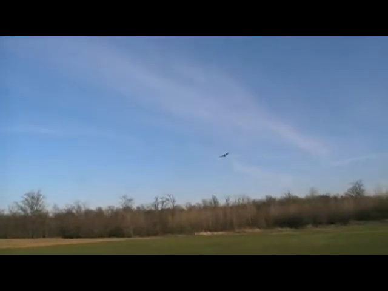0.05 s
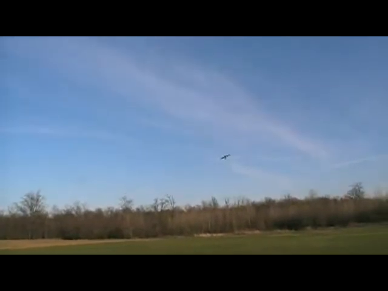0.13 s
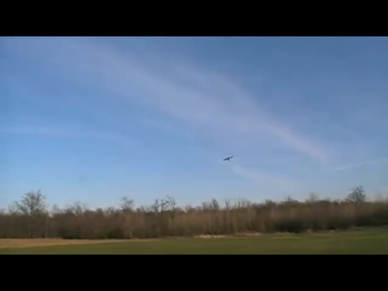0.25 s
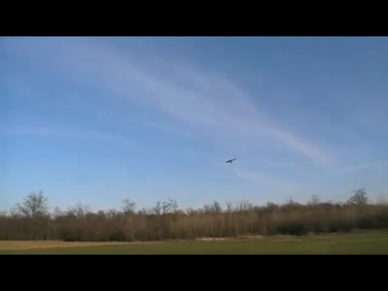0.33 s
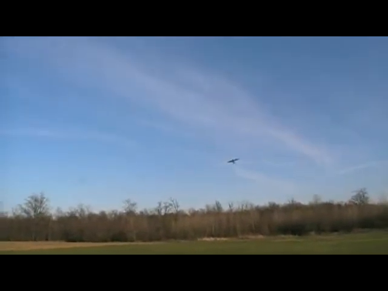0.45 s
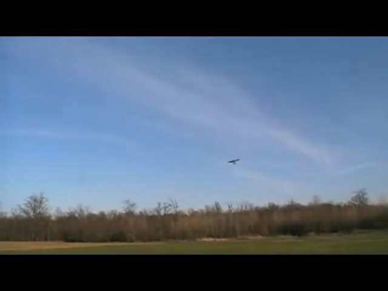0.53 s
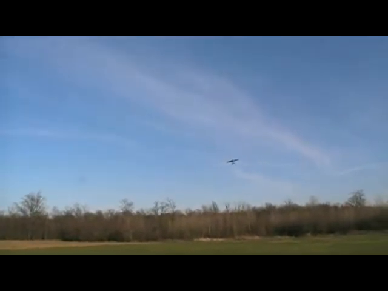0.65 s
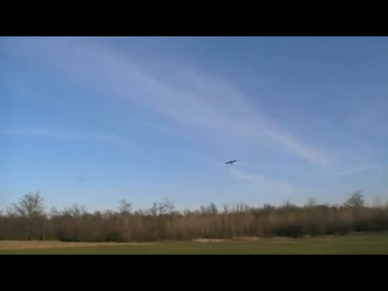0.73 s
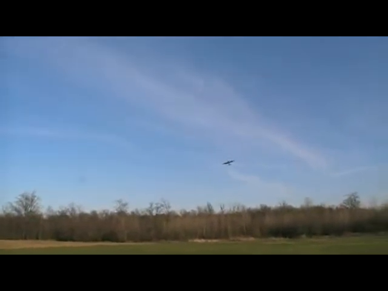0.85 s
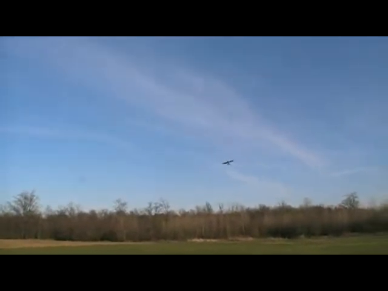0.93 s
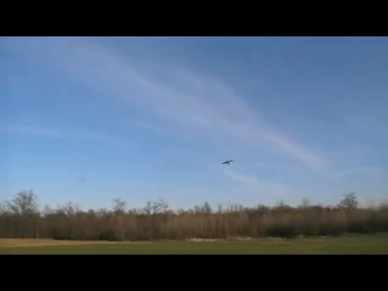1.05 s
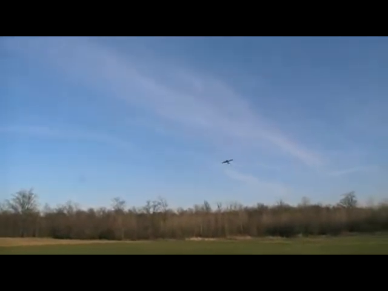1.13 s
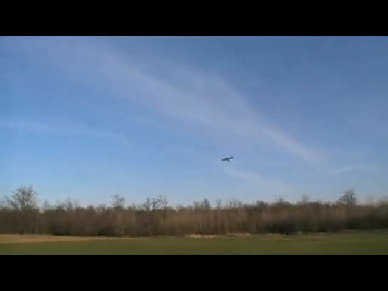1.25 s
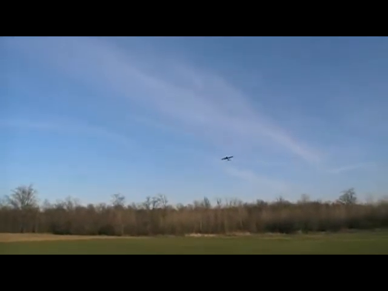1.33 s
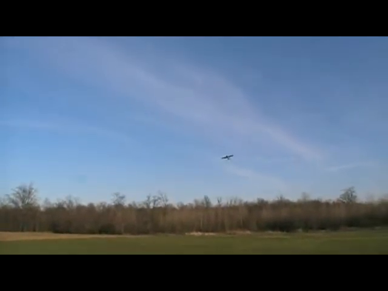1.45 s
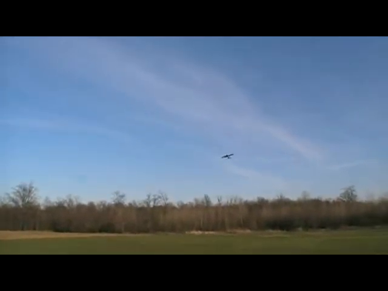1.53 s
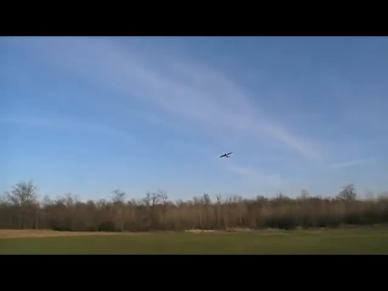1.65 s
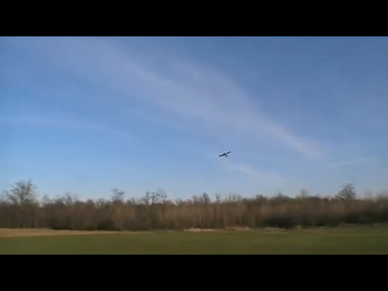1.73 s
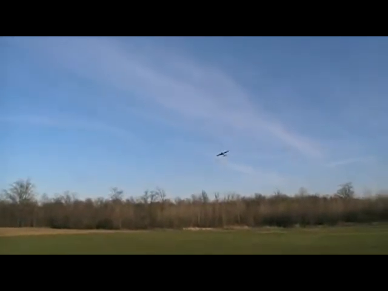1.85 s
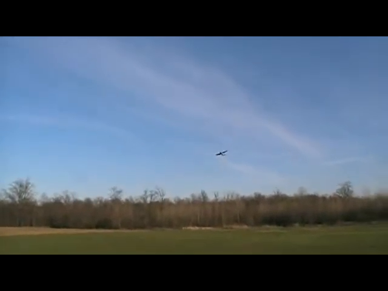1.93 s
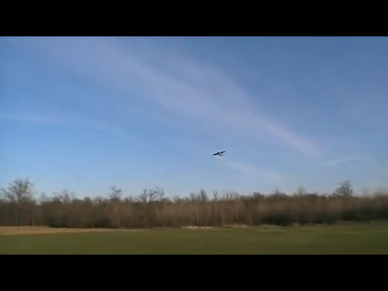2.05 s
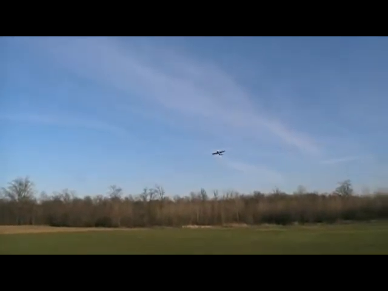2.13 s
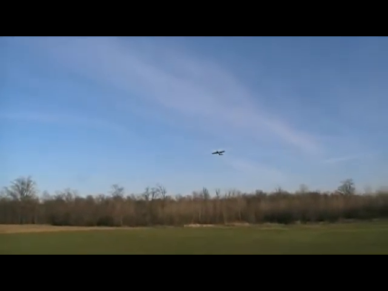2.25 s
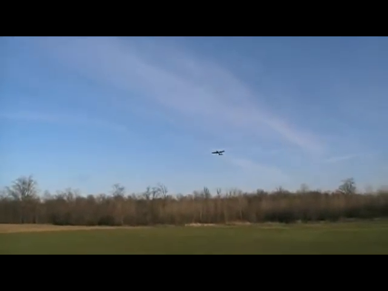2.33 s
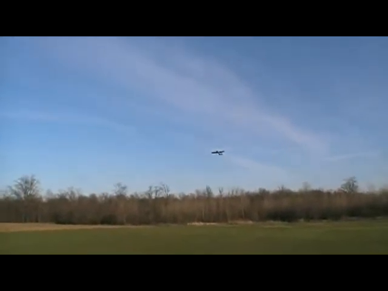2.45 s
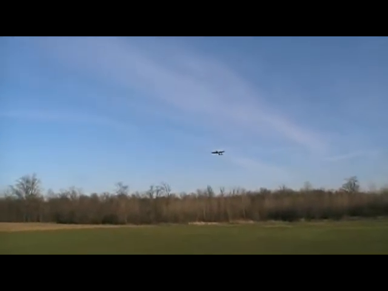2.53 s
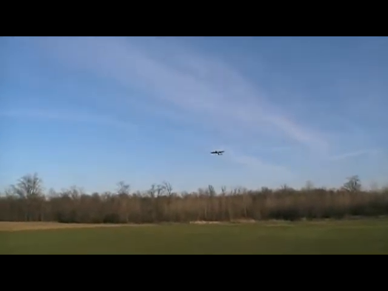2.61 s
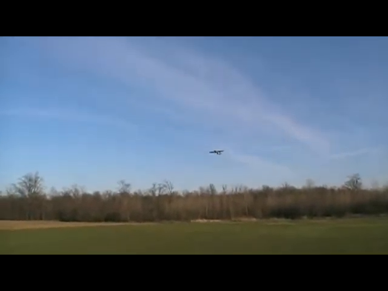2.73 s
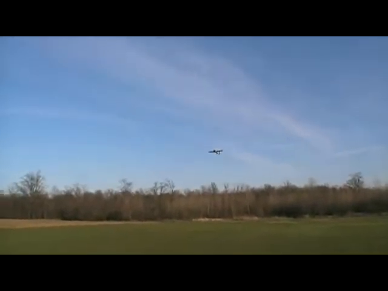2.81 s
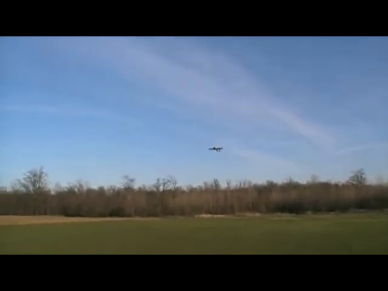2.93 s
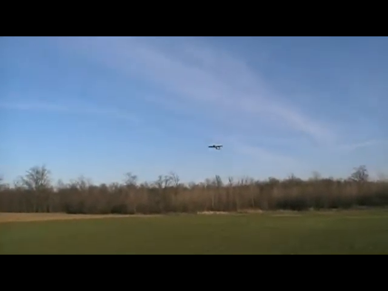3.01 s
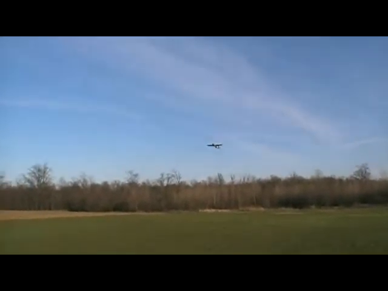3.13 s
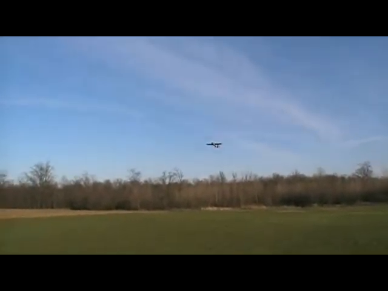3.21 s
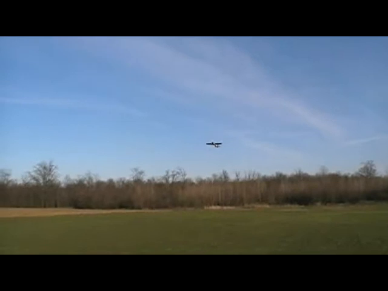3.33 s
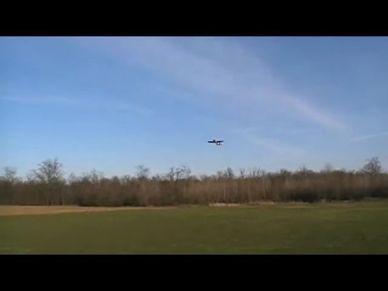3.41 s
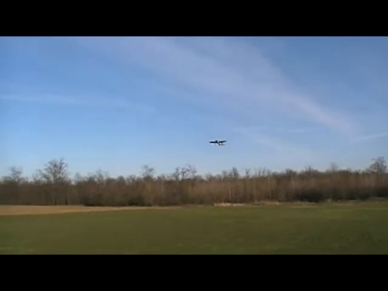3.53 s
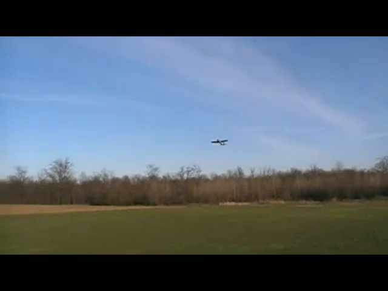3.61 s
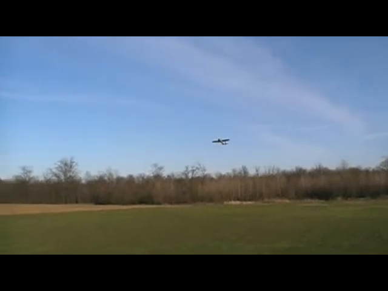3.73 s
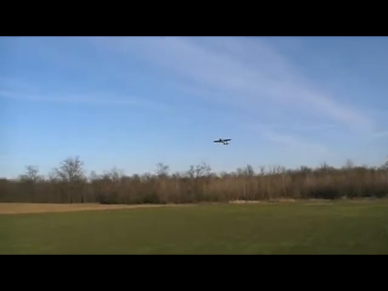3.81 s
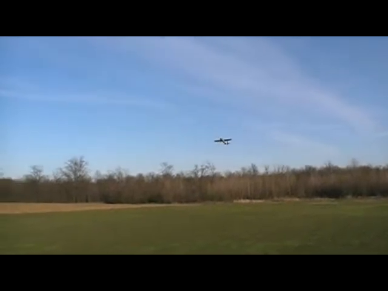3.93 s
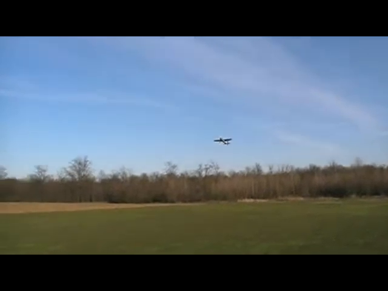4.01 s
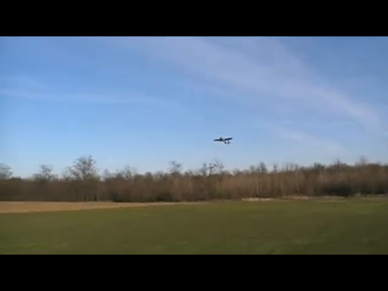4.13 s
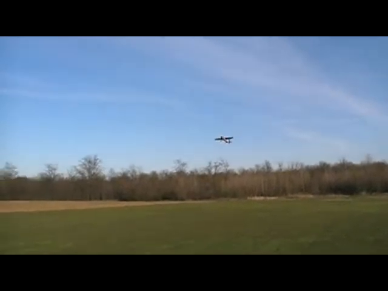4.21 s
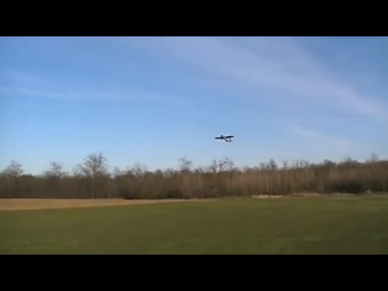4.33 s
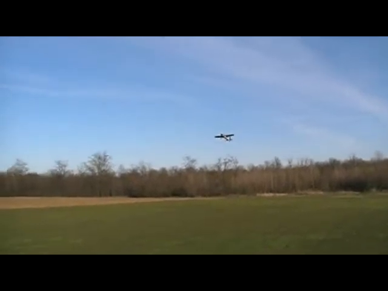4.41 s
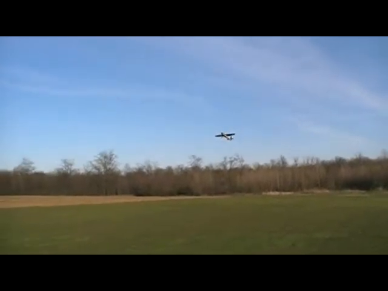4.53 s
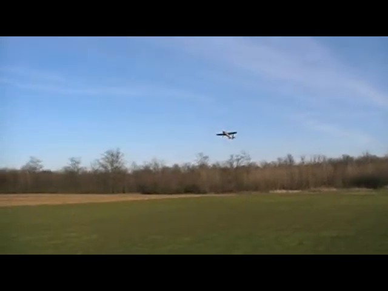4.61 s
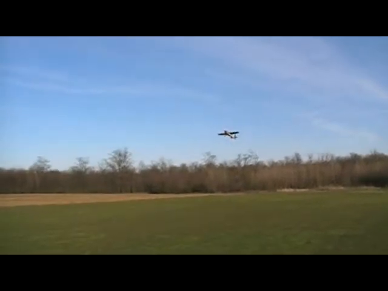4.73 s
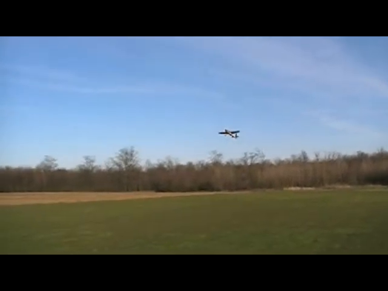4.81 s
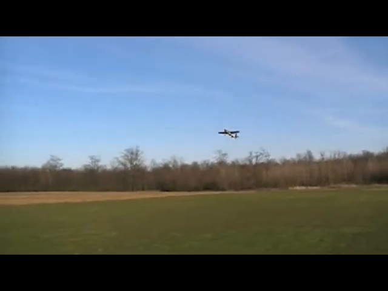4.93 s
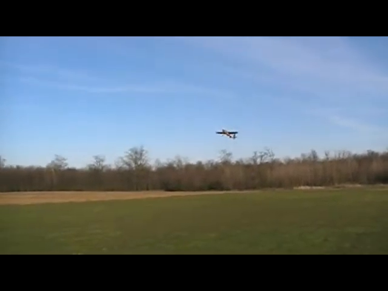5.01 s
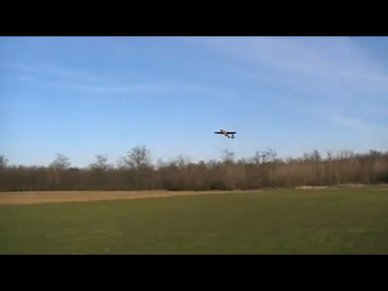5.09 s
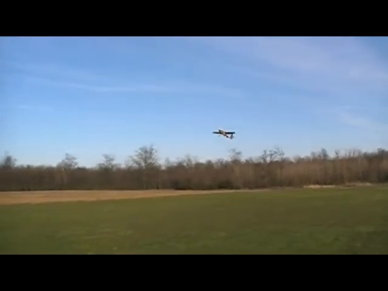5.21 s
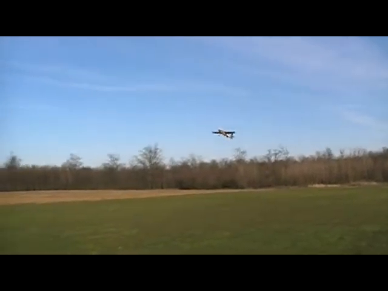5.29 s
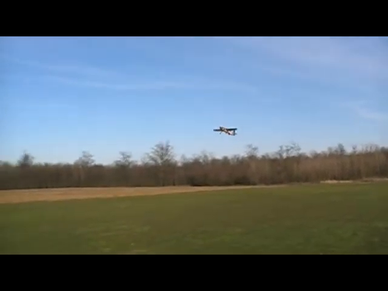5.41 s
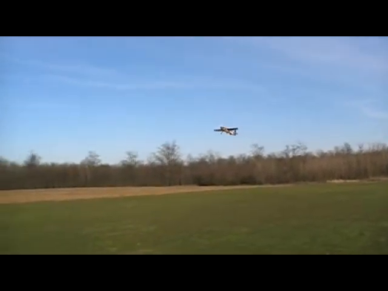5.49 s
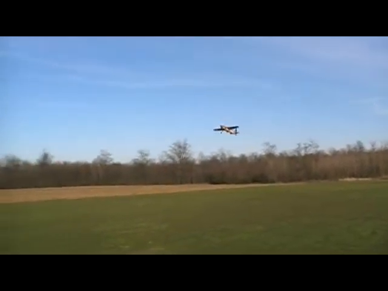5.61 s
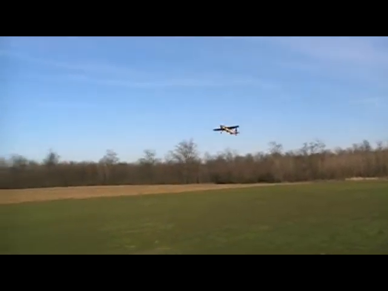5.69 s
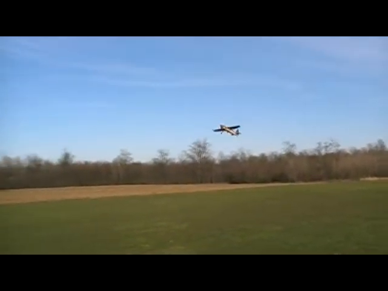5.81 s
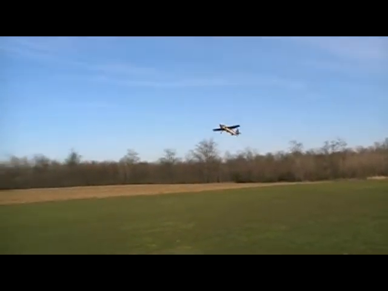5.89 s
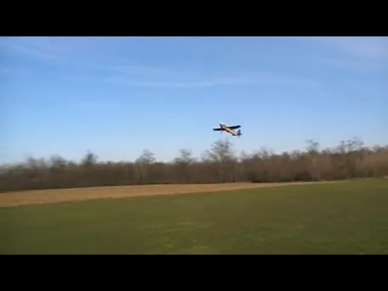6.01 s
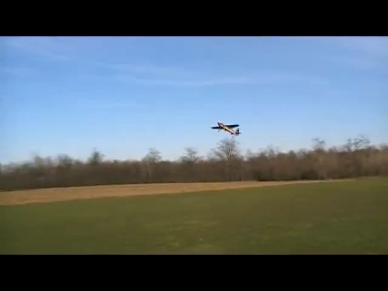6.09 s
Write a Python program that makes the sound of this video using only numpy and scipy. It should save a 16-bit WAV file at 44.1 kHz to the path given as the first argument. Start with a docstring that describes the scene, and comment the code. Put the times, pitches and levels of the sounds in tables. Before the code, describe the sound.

A model plane's two-stroke gasoline engine buzzes throughout, a fast stream of raspy exhaust pops mixed with a propeller hum, heard from the ground in an open field with faint echoes from the trees. It starts distant and rather dull at high revs, sags in pitch by 1 second, and picks up again around 1.4 seconds, with a few sharper cracks. Between about 2 and 2.6 seconds it slows and sputters unevenly, then revs back up by 3 seconds, becoming clearly louder. The pitch eases down to a low near 4.5 seconds and climbs again by 5.5 seconds. As the plane approaches, a bright sizzle comes out in the exhaust, and the sound is loudest from about 5.4 seconds to the end just after 6. A quiet, low wind rumble lies underneath, with brief gusts, the strongest near 4.8 seconds.

```python
"""A grass field edged by trees: a model plane flies in low, its throttle rising and falling.
Its two-stroke gasoline engine fires on every second turn. Each firing is a muffler thump followed by
a short jet of gas that rasps and sizzles, while the propeller hums along.
The ground returns every pop under 2 ms later, the trees scatter it, and the plane grows louder and
brighter as it nears. Wind rumbles underneath."""
import sys
import numpy as np
from scipy import signal
from scipy.fft import rfft, irfft, next_fast_len
from scipy.io import wavfile
from scipy.ndimage import map_coordinates

SR = 44100
rng = np.random.default_rng(int(sys.argv[2]) if len(sys.argv) > 2 else 0)


def generate_wav(signal):
    """Clip the signal to [-1, 1] and save it as 16-bit WAV at the path in sys.argv[1]."""
    frames = np.transpose(np.atleast_2d(signal))
    scaled = np.clip(frames, -1, 1) * 32767
    pcm = np.round(scaled).astype(np.int16)
    wavfile.write(sys.argv[1], SR, pcm)


N = 271215

# How fast the engine spins as the throttle opens and closes: time_s, turns_per_s
ENGINE_SPEED = [(0.0, 73.48), (0.339, 71.103), (0.705, 59.558), (1.021, 57.881), (1.422, 67.184),
                (1.693, 65.714), (1.94, 68.812), (2.16, 59.855), (2.395, 54.277), (2.853, 67.929),
                (3.147, 70.671), (3.34, 65.31), (3.958, 65.631), (4.154, 60.033), (4.489, 56.975),
                (4.922, 60.682), (5.347, 70.333), (5.72, 71.033), (6.15, 65.137)]


def firings(turns, idle_db, jitter_s):
    """Time and level of each turn's exhaust puff: strong if the engine fires, weak if not."""
    # Firings on turns that are normally idle: time_s, level_db (0 is a full firing)
    stray_firings = [(2.074, -13), (2.381, -4.5), (2.417, -4), (2.454, -12), (2.491, -11), (2.524, -3),
                     (2.558, -6.5), (2.592, -6)]
    misfire_s = 2.066   # from here on the odd turns fire instead of the even ones
    whole_turns = np.arange(int(turns[-1]) + 1)
    times = np.interp(whole_turns, turns, np.arange(N) / SR)
    fires = (whole_turns + (times > misfire_s)) % 2 == 0
    levels_db = np.where(fires, 0., idle_db)
    for time_s, level_db in stray_firings:
        levels_db[np.argmin(abs(times - time_s))] = level_db
    return times + jitter_s * rng.standard_normal(len(times)), levels_db


def muffler_thump(times, levels_db, port_hz):
    """The exhaust port opens, and a rounded jump in pressure rings through muffler and pipe."""
    # The muffler's outlet lets no deep bass out: corner_hz, width_hz
    bass_cuts = [(434.6, 208), (193, 170)]
    # Pitches that muffler and pipe boost or weaken: pitch_hz, width_hz, boost_db
    resonances = [(153, 75, 14.5), (257, 66, -8.5), (309.6, 72, 7.5), (578, 300, 8.5), (871, 22.3, 15.5),
                  (1555, 200, 11), (2144, 385, 11.5), (2595, 600, 9), (3726, 540, 15.5), (7020, 630, 37.5)]
    pressure = -clicks(times, levels_db)
    pressure = soften(soften(pressure, port_hz), port_hz)
    for corner_hz, width_hz in bass_cuts:
        pressure = signal.lfilter([1, -2, 1], resonance(corner_hz, width_hz), pressure)
    for pitch_hz, width_hz, boost_db in resonances:
        boost = resonance(pitch_hz, width_hz * from_db(boost_db))
        pressure = signal.lfilter(boost, resonance(pitch_hz, width_hz), pressure)
    return rms_one(pressure)


def gas_jet(times, levels_db, spectrum, uneven_db, peak_s, spread, tail_db, tail_s, wash_db):
    """Swirling gas bursts out after each thump and fades into the propeller's steady wash of air."""
    # Firings that crack harder than the rest: time_s, extra_db
    cracks = [(.076, 4), (.692, 2.5), (1.414, 7), (1.535, 4), (1.805, 7), (3.687, 3), (5.702, 5),
              (5.758, 1.5)]
    crack_db = sum(extra_db * (abs(times - time_s) < .008) for time_s, extra_db in cracks)
    puffs = clicks(times, levels_db + crack_db + uneven_db * rng.standard_normal(len(times)))
    age_s = np.arange(1, SR // 40) / SR
    burst = np.exp(-.5 * (np.log(age_s / peak_s) / spread) ** 2)   # more spread draws it out
    tail = from_db(tail_db) * np.exp(-age_s / tail_s) * (age_s > peak_s)
    flow = signal.fftconvolve(puffs, burst + tail)[:N]
    return rms_one(np.hypot(flow, from_db(wash_db)) * colour(stereo_noise(), spectrum))


def rasp(times, levels_db):
    """The coarse, lower part of the gas jet, which carries far."""
    # Tone of the rasp: pitch_hz, level_db
    spectrum = [(300, -50), (600, -4), (950, 8), (1350, 1), (1800, 2.5), (2300, 1), (3000, -7.5),
                (4500, -15), (9000, -51.5)]
    jet = gas_jet(times, levels_db, spectrum, uneven_db=2, peak_s=.00099, spread=.46,
                  tail_db=-7, tail_s=.0027, wash_db=-11)
    return flight_gain(-32.2, effort_db=2.5, air_loss_db_per_m=.05) * jet


def sizzle(times, levels_db):
    """The fine, high part of the gas jet: air soaks it up, so it comes out as the plane nears."""
    # Tone of the sizzle: pitch_hz, level_db
    spectrum = [(1500, -22), (2800, 1), (3700, 0.5), (5000, -2.5), (6600, 2.5), (8000, -2), (10200, -5.5),
                (11500, -14), (14500, -23), (16500, -46)]
    jet = gas_jet(times, levels_db, spectrum, uneven_db=1.8, peak_s=.00083, spread=.52,
                  tail_db=-9, tail_s=.0061, wash_db=-21)
    return flight_gain(-34.5, effort_db=-.5, air_loss_db_per_m=.2146) * jet


def propeller(turns, offset_turns, waver_db, waver_turns):
    """Two blades hum at even multiples of the engine speed, wavering in the rough air."""
    # Tones in the hum: cycles_per_turn, level_db
    tones = [(2, -19.5), (6, -10.5), (8, -2.5), (10, -14.5), (12, -20), (14, -14), (16, -12)]
    blade_turns = turns - offset_turns + waver_turns * drift(20)
    hum = np.zeros(N)
    for cycles, level_db in tones:
        hum += from_db(level_db + waver_db * drift(18)) * np.cos(2 * np.pi * cycles * blade_turns)
    return rms_one(hum)


def flight_gain(level_db, effort_db, air_loss_db_per_m=0):
    """Sound fades with distance and in the air; each doubling of engine speed adds effort_db."""
    # How faint and dull the plane sounds, as an apparent distance: time_s, apparent_distance_m
    apparent_distance = [(0, 94.5), (1.0, 89.5), (1.7, 78.4), (2.45, 87), (2.85, 64), (3.7, 55.4),
                         (4.5, 47), (5.45, 38.2), (6.15, 40)]
    reference_m, cruise_turns_per_s = 50, 65   # level_db holds at this distance and speed
    apparent_distance_m = curve(apparent_distance)
    doublings = np.log2(curve(ENGINE_SPEED) / cruise_turns_per_s)
    air_loss_db = air_loss_db_per_m * (apparent_distance_m - reference_m)
    return from_db(level_db + effort_db * doublings - air_loss_db) * reference_m / apparent_distance_m


def ground_bounce(sound, grass_share, soil_share, soil_hz):
    """The direct sound plus its bounce off the ground, which is fuller and later in the bass."""
    # The bounce comes later when the plane stands higher in the sky: time_s, delay_ms
    echo_delay = [(0, 1.795), (1.2, 1.858), (2.5, 1.78), (3.5, 1.572), (4.05, 1.578), (5.7, 1.702),
                  (6.15, 1.842)]
    echo = delay(sound, curve(echo_delay))
    return (sound + grass_share * echo + soil_share * soften(echo, soil_hz)) / np.hypot(1, grass_share)


def tree_echoes(sound, fade_s, dull_hz):
    """Countless faint, dull echoes from the field and the trees die away by 60 dB in fade_s."""
    age_s = np.arange(SR) / SR
    tail = stereo_noise()[:, :SR] * from_db(-60 * age_s / fade_s)
    tail = soften(rms_one(tail) / np.sqrt(SR), dull_hz)
    return signal.fftconvolve(sound, tail, axes=1)[:, :N]


def wind(level_db, swing_db, gust_width_s):
    """A low rumble that wanders in level and swells briefly with each gust."""
    # Gusts over the steady wind: peak_s, extra_db
    gusts = [(1.36, 5.5), (2.85, 5.5), (3.39, 3), (3.98, 6), (4.77, 11.5)]
    # Tone of the wind and distant rumble: pitch_hz, level_db
    spectrum = [(20, -34), (40, -36), (55, -20), (73, 1), (95, -10.5), (125, -17.5), (250, -13.5),
                (600, -5.5), (2000, -18.5), (12000, -81)]
    t = np.arange(N) / SR
    gust_db = sum(db * np.exp(-.5 * ((t - peak_s) / gust_width_s) ** 2) for peak_s, db in gusts)
    gain = from_db(level_db + swing_db * drift(9.8) + gust_db)
    return gain * rms_one(colour(stereo_noise(), spectrum))


def stereo_noise():
    """Hiss that is alike in both ears in the bass and less so in the treble."""
    # Strength of the part that differs between the ears: pitch_hz, level_db
    stereo_width = [(50, -24), (500, -15.5), (2000, -13.5), (6000, -15.5), (12000, -8)]
    middle, side = rng.standard_normal((2, N))
    return middle + colour(side, stereo_width) * [[1], [-1]]


def clicks(times, levels_db):
    """One click of the given level at each time."""
    out = np.zeros(N)
    out[np.clip(np.round(times * SR).astype(int), 0, N - 1)] = from_db(levels_db)
    return out


def colour(x, spectrum, power=1):
    """Shape the tone with a (pitch_hz, level_db) table; power multiplies its decibels."""
    hz, db = np.transpose(spectrum)
    size = next_fast_len(x.shape[-1] + SR // 10)
    log_hz = np.log(np.maximum(np.fft.rfftfreq(size, 1 / SR), 1))
    gain = from_db(np.interp(log_hz, np.log(hz), db)) ** power
    return irfft(rfft(x, size) * gain, size)[..., :x.shape[-1]]


def resonance(hz, width_hz):
    """Filter numbers for one ringing pitch; a narrower one rings longer."""
    r = np.exp(-np.pi * width_hz / SR)
    return np.array([1, -2 * r * np.cos(2 * np.pi * hz / SR), r * r])


def soften(x, hz):
    """Gently turn down everything above hz."""
    r = np.exp(-2 * np.pi * hz / SR)
    return signal.lfilter([1 - r], [1, -r], x + 1e-18)


def delay(x, ms):
    """Make a stereo sound arrive later by a steady or changing time."""
    positions = np.arange(N) - ms * SR / 1000
    return np.array([map_coordinates(side, [positions], order=3) for side in x])


def drift(changes_per_s):
    """A slow random wander, typically of size 1."""
    return rms_one(np.interp(np.arange(N) * changes_per_s / SR, np.arange(N), rng.standard_normal(N)))


def curve(rows):
    """Join (time_s, value) points with straight lines, one value per sample."""
    return np.interp(np.arange(N) / SR, *np.transpose(rows))


def from_db(db):
    """Turn decibels into a factor to multiply by."""
    return 10 ** (np.asarray(db) / 20)


def rms_one(x):
    """Scale to an average strength (rms) of 1."""
    return x / np.sqrt(np.mean(x ** 2) + 1e-20)


def scene():
    """Engine and propeller over the grass, their echoes from the trees, and the wind."""
    turns = -1.447 + np.cumsum(curve(ENGINE_SPEED)) / SR   # running count of engine turns
    times, levels_db = firings(turns, idle_db=-23.5, jitter_s=.00007)
    thump = muffler_thump(times, levels_db, port_hz=900)
    hum = from_db(-10.8) * propeller(turns, offset_turns=.057, waver_db=1, waver_turns=.016)
    drone = flight_gain(-25, effort_db=4) * (thump + hum)
    plane = drone + rasp(times, levels_db) + sizzle(times, levels_db)
    plane = ground_bounce(plane, grass_share=.48, soil_share=.41, soil_hz=440)
    echoes = from_db(-7.5) * tree_echoes(plane, fade_s=.71, dull_hz=2400)
    return plane + echoes + wind(level_db=-41.5, swing_db=1.5, gust_width_s=.036)


def record(dry):
    """Two microphones, the right one more sensitive; the highest treble is cut."""
    # Left-right lean, of which each side takes a share: pitch_hz, lean_db (below 0 favours the right)
    balance = [(60, -2), (110, -3), (200, -2.5), (380, -2), (700, -3.0), (1290, -1.5), (2380, -1.5),
               (4400, -5), (8120, 0.5), (15000, -2)]
    pair = np.array([colour(dry[0], balance, power=.69), colour(dry[1], balance, power=-.53)])
    cutoff_hz = 16800
    return signal.sosfilt(signal.cheby2(18, 80, cutoff_hz, fs=SR, output="sos"), pair)


dry = scene()
out = record(dry)
generate_wav(out)
```